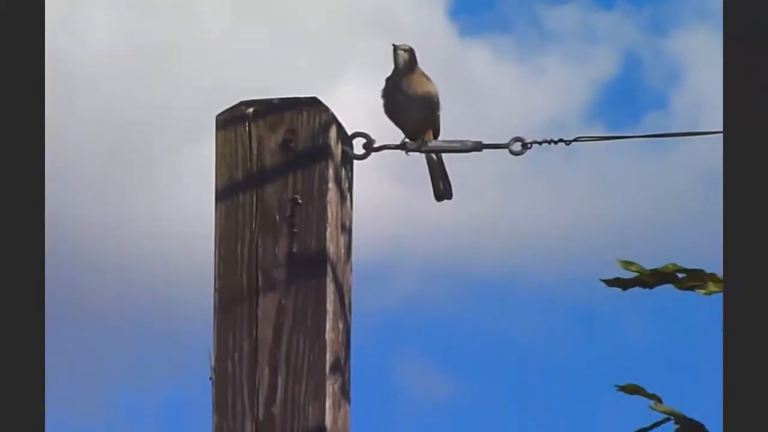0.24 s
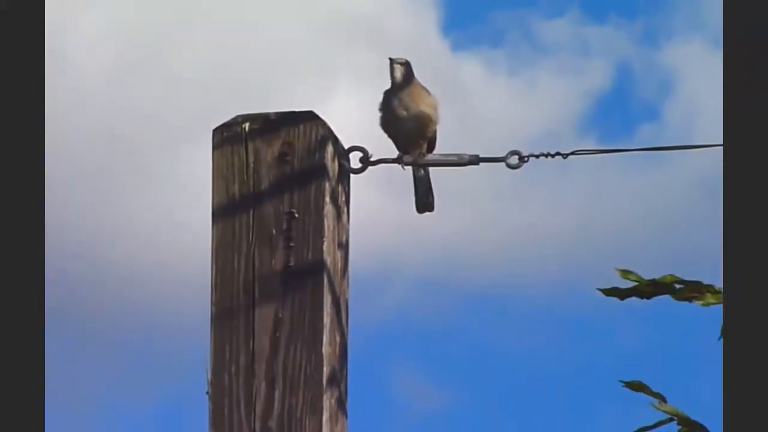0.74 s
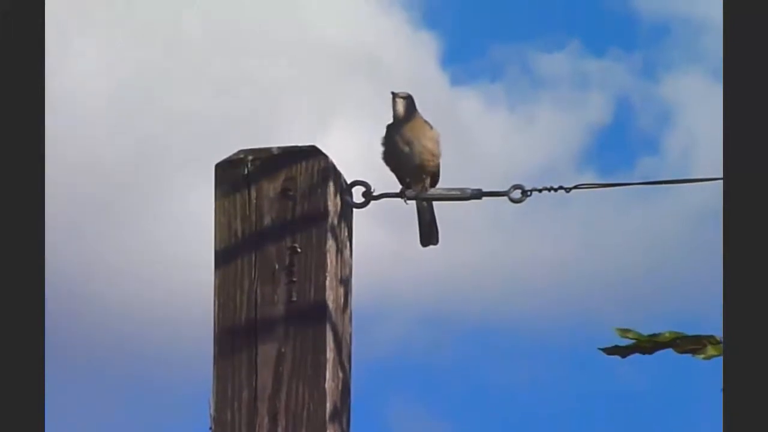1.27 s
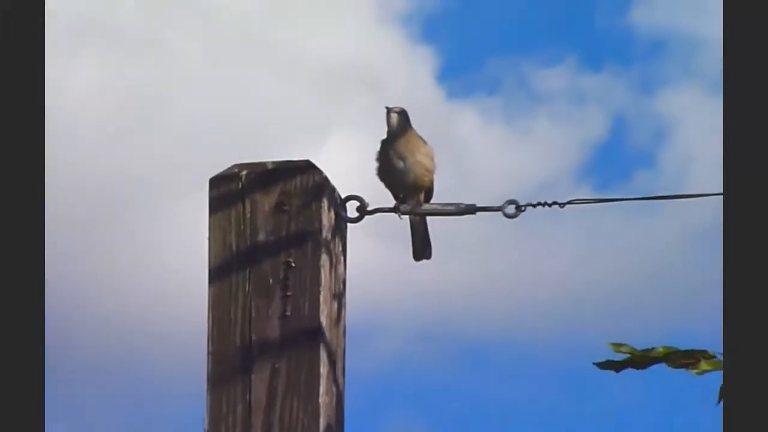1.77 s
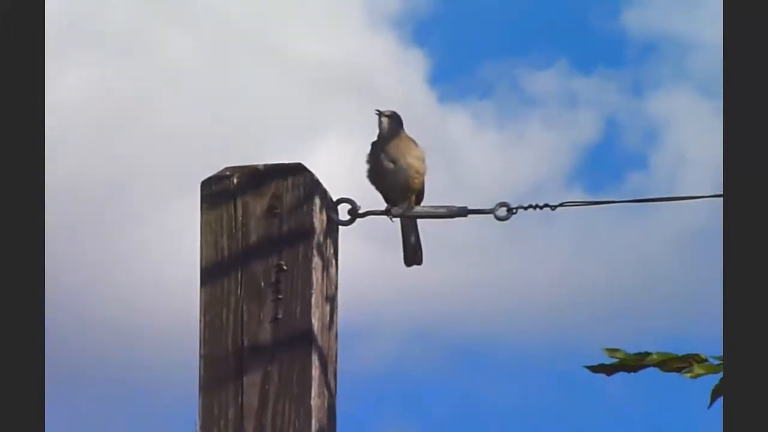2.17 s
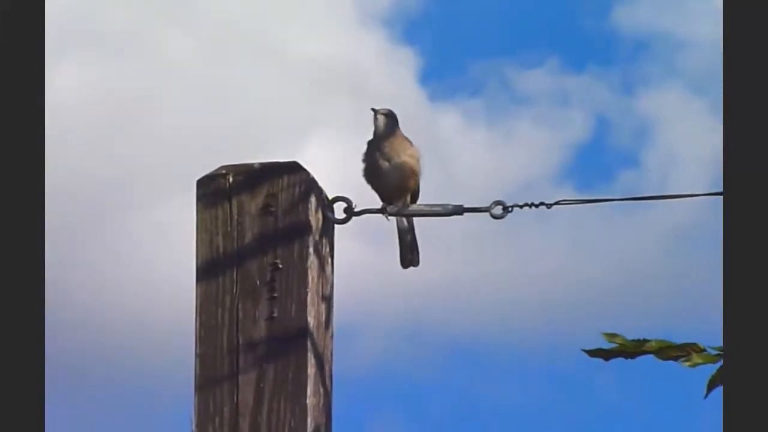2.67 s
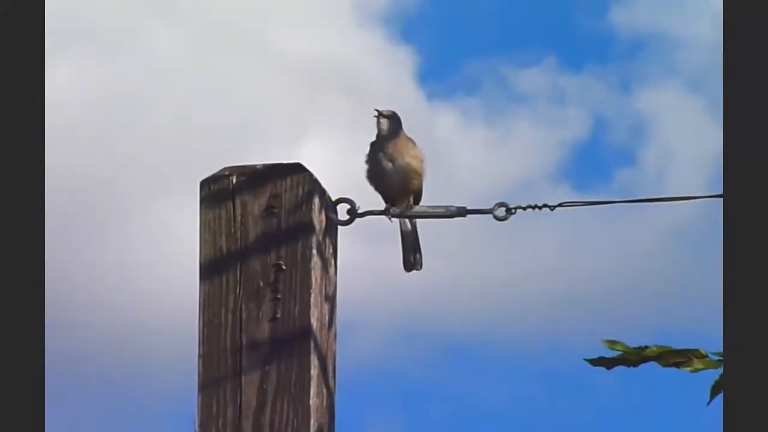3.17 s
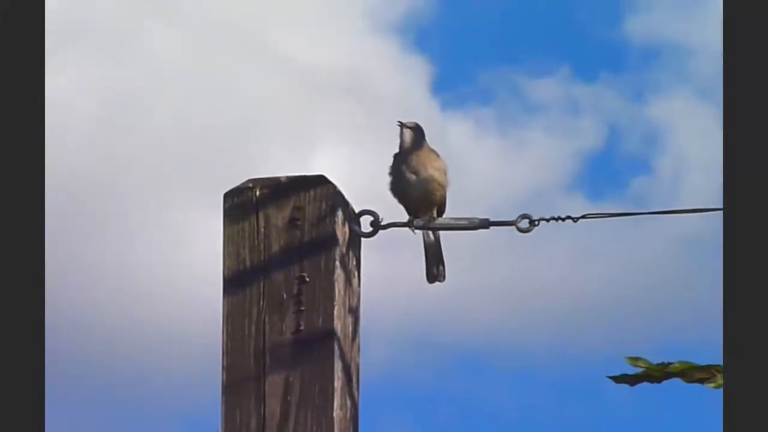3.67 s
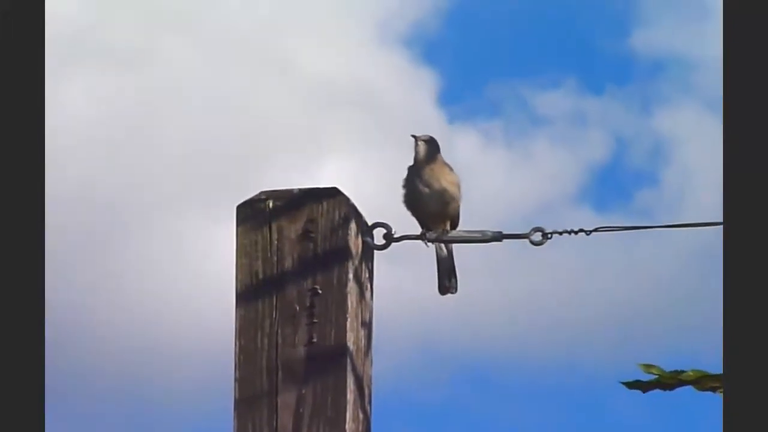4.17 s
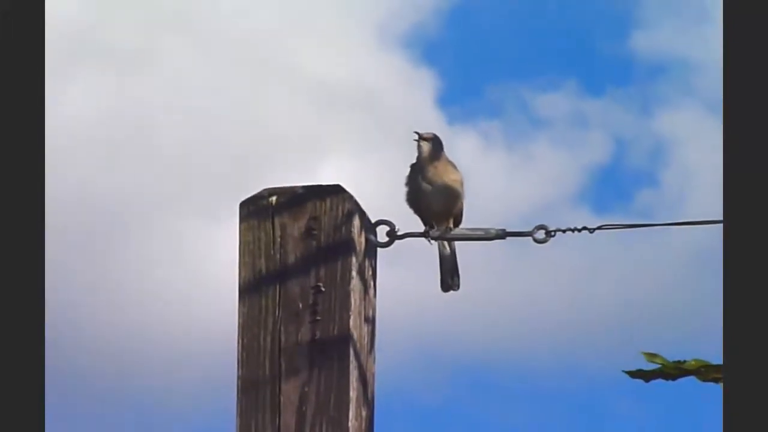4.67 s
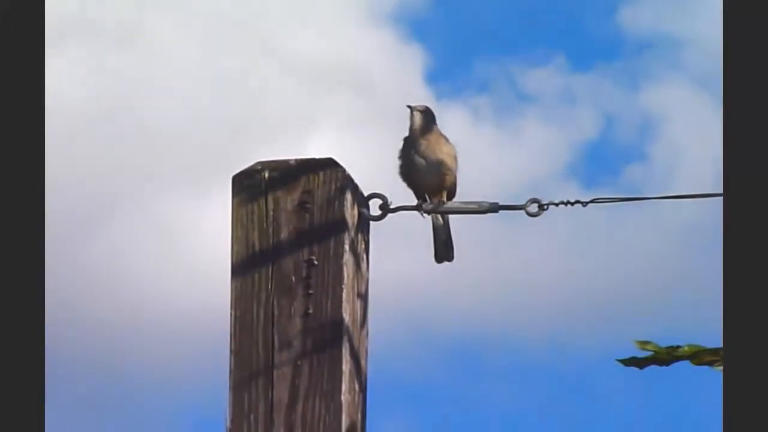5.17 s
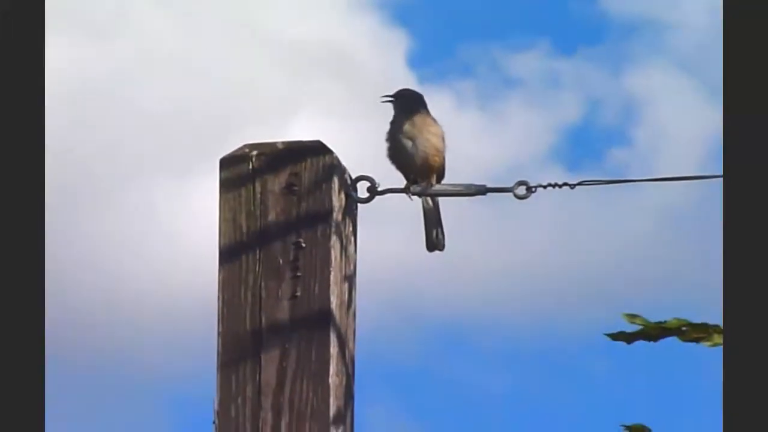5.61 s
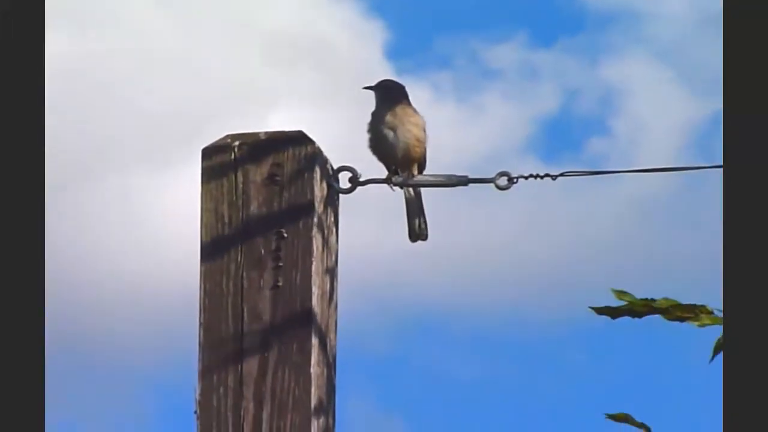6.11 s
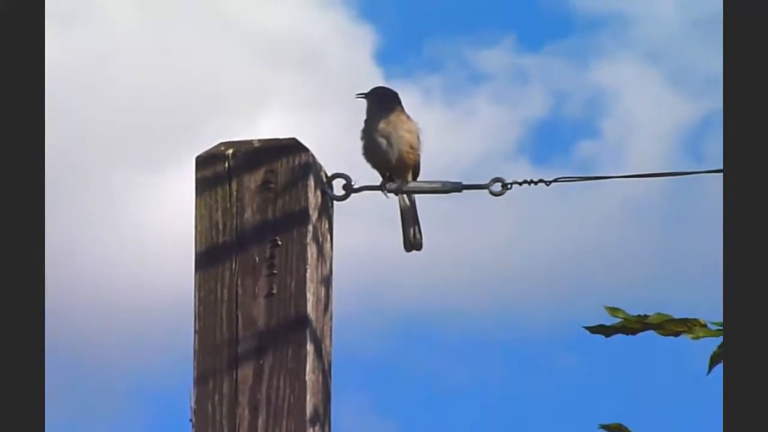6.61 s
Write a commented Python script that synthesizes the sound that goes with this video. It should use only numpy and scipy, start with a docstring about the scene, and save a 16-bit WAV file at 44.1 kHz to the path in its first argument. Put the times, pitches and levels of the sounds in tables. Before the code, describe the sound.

Steady far road noise and a faint high insect trill open the scene. After about a second a perched songbird gives quiet ticking notes, then crisp falling chips, bouncing clusters of bright upward chirps, and shaky rising whistles answered by downward slides. Gaps separate the phrases. A simple outdoor microphone catches light echoes, small wind thumps and a modest, slightly grainy treble.

```python
"""A mockingbird sings soft ticks, sharp falling chips, bursts of rising slurs, long rising whistles and slides.
Each note is a near-pure syrinx tone on its own pitch curve; some gain a rasp of random pitch.
Scattered echoes follow. Behind: shaped-noise traffic, wavering engine tones, an insect of three-stroke
chirps high up, and brief low wind puffs.
All passes a narrow-band microphone whose treble is mirrored about 8 kHz."""
import sys
import numpy as np
from scipy import signal
from scipy.fft import rfft, irfft, next_fast_len
from scipy.io import wavfile

SR = 44100
rng = np.random.default_rng(int(sys.argv[2]) if len(sys.argv) > 2 else 0)


def unload_audio(sound):
    """Save the sound as a 16-bit wav file, at the path given as the first command line argument."""
    columns = np.transpose(np.atleast_2d(sound))
    # keep every value between -1 and 1, then stretch to whole-number steps
    steps = np.round(np.clip(columns, -1, 1) * 32767)
    wavfile.write(sys.argv[1], SR, steps.astype(np.int16))


N = 302085
TIME = np.arange(N) / SR


def from_db(db):
    """Amplitude ratio of a level in dB."""
    return 10 ** (np.asarray(db) / 20)


def rms_one(x):
    """Scale to unit rms."""
    return x / np.sqrt(np.mean(x ** 2) + 1e-20)


def in_time(rows, t=TIME):
    """Columns of a time table, linearly interpolated."""
    s, *columns = np.transpose(rows)
    return [np.interp(t, s, c) for c in columns]


def add(out, s, sound):
    """Mix a sound in at time s."""
    start = max(0, round(s * SR))
    part = sound[:max(0, N - start)]
    out[start:start + len(part)] += part


def noise(spectrum):
    """Gaussian noise shaped to a spectrum, interpolated over log frequency; unit rms."""
    hz, db = np.transpose(spectrum)
    size = next_fast_len(N)
    bins_hz = np.maximum(np.fft.rfftfreq(size, 1 / SR), 1)
    gain = from_db(np.interp(np.log(bins_hz), np.log(hz), db))
    white = rng.standard_normal(size)
    return rms_one(irfft(gain * rfft(white), size)[:N])


def drift(rate_hz, t=TIME):
    """Random wander: unit-variance knots at rate_hz, joined by lines."""
    steps = (t - t[0]) * rate_hz
    knots = rng.standard_normal(int(steps[-1]) + 2)
    return np.interp(steps, np.arange(len(knots)), knots)


def cycle(hz):
    """Phase of an oscillator that follows a pitch curve."""
    return 2 * np.pi * np.cumsum(hz) / SR


def clock(length_s):
    """Sample times of a note, and the share of it that has passed."""
    t = np.arange(int(length_s * SR)) / SR
    return t, t / length_s


def syrinx(hz, t, waver=0.015, waver_rate_hz=420, flutter_db=2.0, second_db=-45,
           slack_hz=3050, slack_span_hz=600, slack_second_db=19):
    """Near-pure tone; at low pitch the membranes slacken, so it wavers more and gains a faint octave."""
    slack = np.clip((slack_hz - hz) / slack_span_hz, 0, 1)
    phase = cycle(hz * (1 + waver * (1 + slack) * drift(waver_rate_hz, t)))
    # flutter_db is a base depth: x1.5 when taut, x2.5 when slack
    flutter = from_db(flutter_db * (1.5 + slack) * drift(256.6, t))
    octave = from_db(second_db + slack_second_db * slack) * np.sin(2 * phase)
    return flutter * (np.sin(phase) + octave)


def beak(hz, centre_hz=3700, width_hz=900):
    """Gain of the throat resonance; pitches above its centre come out weaker."""
    above_hz = np.maximum(hz - centre_hz, 0)
    return 1 / np.sqrt(1 + (above_hz / width_hz * 2) ** 2)


def note(hz, t, u, db, fullness, flutter_db=1.8, slack_second_db=8):
    """One pulse of air through the syrinx; a small fullness exponent gives a flat top."""
    tone = syrinx(hz, t, flutter_db=flutter_db, slack_second_db=slack_second_db)
    pressure = np.sin(np.pi * u) ** fullness
    return from_db(db) * pressure * beak(hz) * tone


def rasp(length_s, centre_hz, db, swing=0.48, swing_rate_hz=1100, width_hz=1900):
    """The other side of the syrinx jumps about in pitch and makes a note harsh."""
    t, u = clock(length_s)
    hz = centre_hz * np.exp(swing * np.tanh(drift(swing_rate_hz, t)))
    pressure = np.sqrt(np.sin(np.pi * u))
    return from_db(db) * pressure * beak(hz, width_hz=width_hz) * np.sin(cycle(hz))


# soft run of ticks: [t/s, level/dB, f/Hz mid-sweep, upward sweep/octaves]
TICKS = [ (.899, -27.5, 2510, 0.64), (.953, -25, 2420, .15), (1.010, -30, 2560, 0.27),
         (1.066, -27, 2420, .1), (1.118, -29, 2450, .12), (1.171, -25, 2400, .12),
         (1.222, -23.5, 2380, .18), (1.278, -28, 2530, 0.33), (1.331, -27.5, 2650, .25),
         (1.387, -25, 2530, 0.42), (1.448, -24, 2400, 0.31), (1.502, -25.5, 2360, .2)]


def ticks(length_s=0.01, level_db=-1.0, fullness=0.55, flutter_db=0.8):
    """Tiny upward flicks of pitch, some steeper than others."""
    out = np.zeros(N)
    t, u = clock(length_s)
    for s, db, mid_hz, octaves in TICKS:
        hz = mid_hz * 2 ** (octaves * (u - .5))
        add(out, s, note(hz, t, u, db + level_db, fullness, flutter_db))
    return out


# harsh chips, mostly paired: [crest t/s, start f/Hz, crest f/Hz, level/dB, rasp level/dB]
CHIPS = [ (2.013, 4000, 3890, -23, -42), (2.043, 3600, 3950, -27, -29), (2.101, 3420, 4030, -24, -37),
         (2.130, 3860, 3870, -30, -34), (2.197, 3440, 3790, -24.5, -38), (2.225, 3400, 3850, -32, -31.5),
         (2.279, 2980, 4160, -22, -34), (2.314, 3020, 3910, -25, -25), (2.399, 2530, 3410, -22, -29.5),
         (2.436, 2980, 4200, -26, -29), (2.451, 2900, 4170, -31, -44), (2.503, 2680, 4480, -21.5, -24),
         (2.538, 2700, 4420, -30, -30)]


def chips(rise_s=.0055, fall_s=0.00784, end_hz=2300, level_db=0.0, fullness=0.36, swell_db=5,
          rasp_s=0.018, rasp_hz=3300):
    """Pitch arches over a crest and plunges while the pressure swells; a rasp sets in at the crest."""
    out = np.zeros(N)
    t, u = clock(rise_s + fall_s)
    rising = t < rise_s
    arch = np.where(rising, t / rise_s - 1, (t - rise_s) / fall_s) ** 2
    for s, start_hz, crest_hz, db, rasp_db in CHIPS:
        hz = crest_hz - (crest_hz - np.where(rising, start_hz, end_hz)) * arch
        swell = swell_db * (u - .5)
        add(out, s - rise_s, note(hz, t, u, db + level_db + swell, fullness))
        add(out, s, rasp(rasp_s, rasp_hz, rasp_db, swing=0.434, swing_rate_hz=1100, width_hz=2000))
    return out


# slur bursts: [t/s, slur count, first slot/s, start f/Hz, top f/Hz,
#               first bend (<1 climbs early), level/dB, fade/dB per slur]
BURSTS = [ (3.021, 3, 0.03, 2950, 4300, 0.78, -23, -0.5), (3.171, 4, 0.029, 2960, 4570, 0.61, -19, 5),
          (3.287, 5, .029, 2935, 4400, 0.5, -24.5, 0.2), (3.620, 3, 0.03, 3250, 4650, 1.34, -20, 3),
          (3.734, 4, .031, 3220, 4550, 1.3, -19.5, 1.7), (3.869, 3, 0.031, 3250, 4430, 0.72, -14.5, 3.5),
          (4.000, 5, 0.023, 3310, 4290, 1.2, -16.5, 1.1)]
SLUR_SHRINK, SLUR_SAG_HZ = .85, 170   # per slur: length ratio, drop of top pitch


def bursts(sounding=0.863, start_spread_hz=200, bend_spread=.25, linger=0.057, fullness=0.4, level_db=0.0):
    """Each burst runs down like a bouncing ball, its slurs shorter and lower; each lingers halfway up."""
    out = np.zeros(N)
    for s, count, first_s, start_hz, top_hz, first_bend, db, fade_db in BURSTS:
        for k in range(round(count)):
            slot_s = first_s * SLUR_SHRINK ** k
            t, u = clock(sounding * slot_s)
            low_hz = start_hz + start_spread_hz * rng.normal() * (k > 0)
            bend = np.exp(bend_spread * rng.normal()) if k else first_bend
            climb = (u + linger * np.sin(2 * np.pi * u)).clip(0) ** bend
            hz = low_hz + (top_hz - SLUR_SAG_HZ * k - low_hz) * climb
            add(out, s, note(hz, t, u, db + level_db - fade_db * k, fullness))
            s += slot_s
    return out


# long rising whistles, one list each: [t/s, f/Hz, level/dB]
RISES = [
    [(4.492, 2786, -26), (4.51, 2664, -17), (4.526, 2910, -21.5), (4.582, 2896, -27), (4.618, 3210, -31.5),
     (4.64, 3320, -24), (4.69, 3350, -18.5), (4.702, 3517, -20.5), (4.73, 3650, -19)],
    [(5.424, 2550, -24), (5.44, 2450, -24), (5.466, 2864, -27), (5.518, 2990, -43), (5.534, 3043, -33.5),
     (5.544, 3120, -35), (5.608, 3710, -18), (5.636, 4280, -21), (5.648, 4210, -29)],
    [(6.762, 2410, -28), (6.77, 2435, -30), (6.784, 2816, -18), (6.792, 2850, -22.5), (6.805, 2870, -35.5)],
]


def rising_whistles(level_db=1.0, shake_hz=150, shake=0.049, settle_s=0.17, shake_db=-1.0,
                    push_db=2, push_s=.01):
    """Long climbs that begin with a push of air and a fast shake, which settles as the pitch rises."""
    out = np.zeros(N)
    for rows in RISES:
        t = np.arange(rows[0][0], rows[-1][0], 1 / SR)
        hz, db = in_time(rows, t)
        age = t - t[0]
        wobble = np.exp(-age / settle_s) * np.sin(cycle(shake_hz * (1 + 0.22 * drift(79, t))))
        gate = np.clip(np.minimum(age, t[-1] - t) / .003, 0, 1)   # 3 ms ramps
        push = push_db * np.exp(-age / push_s)
        pressure = gate * from_db(db + level_db + push + shake_db * wobble)
        add(out, t[0], pressure * syrinx(hz * (1 + shake * wobble), t))
    return out


# smooth slides, mostly falling: [t/s, length/s, start f/Hz, end f/Hz, bend (>1 moves early), level/dB]
SLIDES = [ (4.721, 0.023, 3700, 5200, 0.57, -25.5), (4.831, 0.091, 4960, 2910, 1.35, -17),
          (4.932, 0.057, 3000, 3750, 1.5, -30), (4.961, .031, 3690, 3320, .6, -15),
          (4.99, 0.024, 2700, 2450, .7, -23), (4.994, 0.036, 3500, 2660, 1.3, -28),
          (5.761, 0.11, 5160, 2650, 2.07, -23), (6.750, .014, 3700, 2600, 0.71, -26.5)]


def slides(attack_s=0.0093, release_s=0.011, level_db=0.0, width_hz=2200):
    """Smooth whistled glides at a steady pressure."""
    out = np.zeros(N)
    for s, length_s, start_hz, end_hz, bend, db in SLIDES:
        t, u = clock(length_s)
        hz = end_hz + (start_hz - end_hz) * (1 - u) ** bend
        pressure = np.clip(np.minimum(t / attack_s, (length_s - t) / release_s), 0, 1)
        tone = syrinx(hz, t, flutter_db=1.66, slack_second_db=12)
        add(out, s, from_db(db + level_db) * pressure * beak(hz, width_hz=width_hz) * tone)
    return out


# second-voice rasps over slurs and whistles: [t/s, length/s, level/dB]
RASPS = [(3.168, 0.086, -34), (3.31, 0.043, -31), (4.043, .025, -25), (4.726, .028, -30)]


def rasps(centre_hz=3650, swing=0.268, swing_rate_hz=700):
    """The second voice turns a few notes harsh."""
    out = np.zeros(N)
    for s, length_s, db in RASPS:
        add(out, s, rasp(length_s, centre_hz, db, swing, swing_rate_hz))
    return out


def yard(x, near_db=-9.5, near_t60_s=0.15, far_db=-22.0, far_t60_s=0.69, first_s=.007, echoes_per_s=2500):
    """Scattered echoes: strong early ones from close surfaces, a faint tail from farther off."""
    t = np.arange(SR) / SR
    hits = rng.random((2, SR)) < echoes_per_s / SR
    scatter = rng.standard_normal((2, SR)) * hits * (t > first_s)
    echoes = scatter * from_db(-60 * t / np.array([[near_t60_s], [far_t60_s]]))
    echoes /= np.linalg.norm(echoes, axis=1, keepdims=True)
    response = from_db([near_db, far_db]) @ echoes
    return x + signal.fftconvolve(x, response)[:N]


# road: [t/s, rumble level/dB, tyre roar level/dB, tyre hiss level/dB]
ROAD = [(0.0, -34, -29.5, -34), (0.11, -35, -32, -34), (0.76, -35.5, -29, -32), (2.7, -36.5, -31, -36),
        (2.75, -35, -32, -35.5), (3.65, -37, -32, -38.5), (3.82, -36, -34.5, -38.5),
        (4.98, -37, -34.5, -39), (6.72, -35, -30, -32), (6.82, -36, -30.5, -32.5)]
# relative spectra of the three layers: [f/Hz, level/dB]
RUMBLE = [(20, -37), (35, -11), (55, -8.5), (80, -2), (130, 0.5), (200, -2), (260, -6), (400, -31.5),
          (800, -40.5)]
ROAR = [(100, -40), (200, -9.5), (270, -1), (450, 2), (850, 1), (1000, -2), (1300, -20), (2500, -46)]
HISS = [(500, -41), (850, -3), (1050, 1), (1450, -0.5), (2000, -8), (2600, -13.5), (3200, -20),
        (4000, -24.5), (5000, -33.5), (6000, -44.5), (7500, -34.5)]


def traffic(rumble_db=-0.6, roar_db=0.28, hiss_db=1.35, unrest_db=.5):
    """Far road noise: low rumble, tyre roar and tyre hiss, each shaped noise on a level curve."""
    rumble, roar, hiss = in_time(ROAD)
    layers = [(RUMBLE, rumble + rumble_db), (ROAR, roar + roar_db), (HISS, hiss + hiss_db)]
    return sum(from_db(db + unrest_db * drift(12)) * noise(spectrum) for spectrum, db in layers)


# far engines: [start t/s, end t/s, f/Hz, start rms level/dB, end rms level/dB]; pitch and level wander
ENGINES = [(0, 2.26, 119.3, -36.5, -48.5), (2.4, 6.85, 94.36, -49, -38), (5.3, 6.85, 218, -51, -40)]


def engines(wander=0.0145, fading_db=1.5, fade_s=0.11):
    """Firing tones of far engines, sines that fade in and out on their way through the air."""
    out = np.zeros(N)
    for start, end, hz, start_db, end_db in ENGINES:
        t, u = clock(end - start)
        db = start_db + (end_db - start_db) * u + fading_db * drift(7.4, t)
        gate = np.clip(np.minimum(t, t[-1] - t) / fade_s, 0, 1)
        tone = np.sqrt(2) * np.sin(cycle(hz * (1 + wander * drift(14, t))))   # unit rms
        add(out, start, gate * from_db(db) * tone)
    return out


# insect, slowly louder and quicker: [t/s, stroke level/dB, mean pause between chirps/s]
INSECT = [(0, -48, .024), (6.85, -45.5, .012)]


def insect(stroke_gap_s=.0162, stroke_s=0.01, top_hz=7150, bottom_hz=6700, opening_db=-8, opening_hz=6500,
           scrape=0.061, first_db=-3, tooth_jitter=.018):
    """Chirps of three wing strokes, the first soft; closings fall in pitch, openings scrape lightly."""
    out, s = np.zeros(N), .022
    t, u = clock(stroke_s)
    shape = np.sin(np.pi * u) ** 2
    closing_hz = np.linspace(top_hz, bottom_hz, len(t))
    while s < TIME[-1]:
        db, pause_s = in_time(INSECT, s)
        for accent_db in (first_db * rng.exponential(), 0, 0):
            stroke = from_db(db + accent_db + rng.normal(0, 1)) * shape
            closing = np.sin(cycle(closing_hz * (1 + tooth_jitter * drift(2000, t))))
            opening = np.sin(cycle(opening_hz * (1 + scrape * drift(2000, t))))
            add(out, s, stroke * closing)
            add(out, s - stroke_gap_s / 2, from_db(opening_db) * stroke * opening)
            s += stroke_gap_s
        s += abs(pause_s) * rng.uniform(.7, 1.3)
    return yard(out, near_db=-17, near_t60_s=0.061, far_db=-16.0, far_t60_s=0.81)


# relative wind spectrum: [f/Hz, level/dB]
WIND = [(15, -12), (35, -3), (80, 5), (140, -12), (400, -46), (1500, -100)]
# wind puffs on the microphone: [peak t/s, rms level at peak/dB]
PUFFS = [(3.85, -39), (4.0, -30), (4.17, -31)]


def wind(puff_s=0.027):
    """Soft low noise puffs that swell and die exponentially."""
    envelope = sum(from_db(db) * np.exp(-np.abs(TIME - s) / puff_s) for s, db in PUFFS)
    return noise(WIND) * envelope


def scene():
    """The bird and its echoes over the insect, the road and the wind."""
    bird = yard(ticks() + chips() + bursts() + rasps() + rising_whistles() + slides())
    return (bird + insect() + traffic() + engines() + wind())[None]


def record(dry, band_hz=7400, floor_db=-90, image_slope=2.38, sampling_hz=16000, cutoff_hz=12250):
    """A 16 kHz recorder joins its samples by straight lines, which mirrors the treble about 8 kHz."""
    narrow = signal.sosfiltfilt(signal.butter(18, band_hz, fs=SR, output="sos"), dry)
    sampled = narrow * (1 + 2 * np.cos(2 * np.pi * sampling_hz * TIME))
    hz = np.fft.rfftfreq(N, 1 / SR)
    # a mirror image is weaker by about the squared ratio of the two frequencies
    image = np.minimum(1, np.abs(sampling_hz - hz) / np.maximum(hz, 1)) ** image_slope
    out = irfft(rfft(sampled) * image, N) + from_db(floor_db) * rng.standard_normal(N)
    return signal.sosfilt(signal.ellip(12, .1, 80, cutoff_hz, fs=SR, output="sos"), out)


dry = scene()
out = record(dry)
unload_audio(out)
```